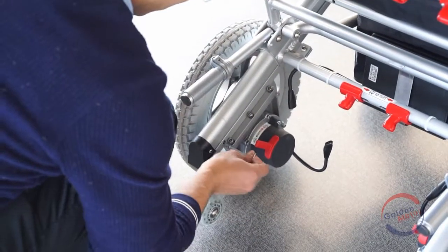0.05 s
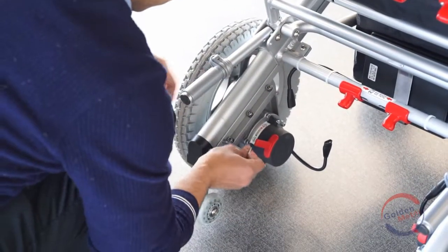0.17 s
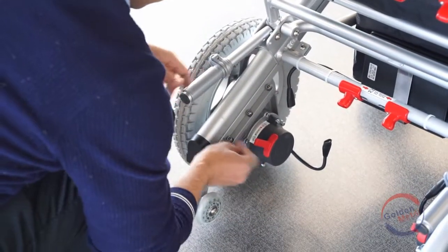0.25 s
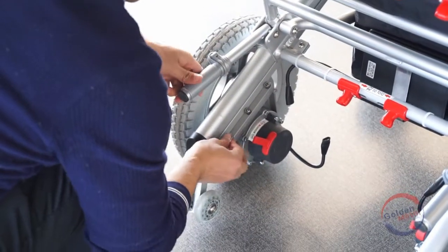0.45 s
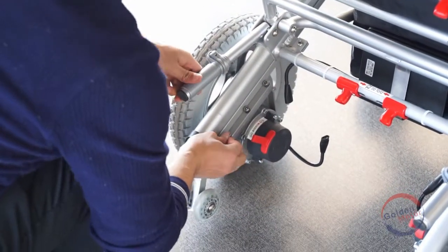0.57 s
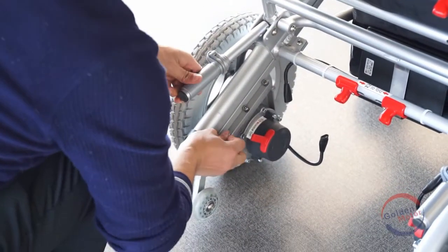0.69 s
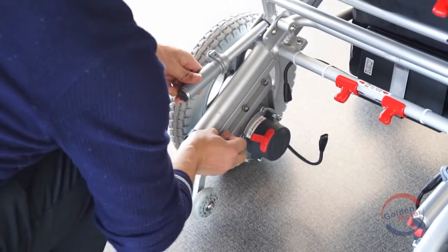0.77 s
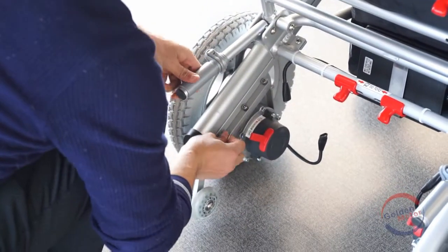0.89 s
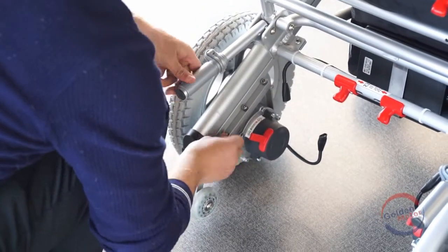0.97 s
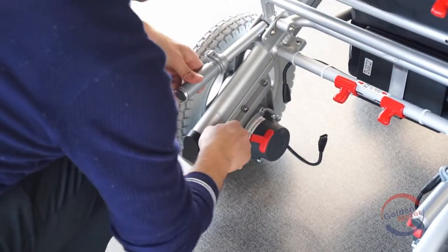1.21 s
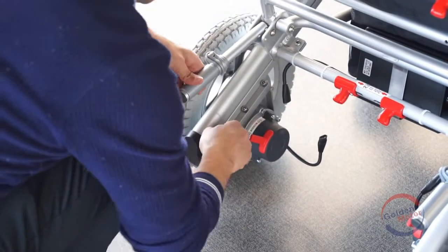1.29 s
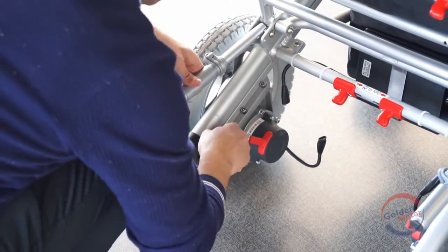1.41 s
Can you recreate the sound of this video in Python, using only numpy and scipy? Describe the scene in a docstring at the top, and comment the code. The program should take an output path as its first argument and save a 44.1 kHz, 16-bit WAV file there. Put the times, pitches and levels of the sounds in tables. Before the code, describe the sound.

A metal release catch on a wheelchair wheel ticks lightly, then snaps with a bright double clack and faint tube ringing; a tiny tick follows. Close stereo pickup, slightly right, in a reverberant hard-floored room with quiet ventilation.

```python
"""A hand works the release on the wheel motor of a folding wheelchair in a large, hard-floored room.
Ventilation runs throughout: banded noise and a wavering hum. The catch ticks, slips and snaps home with a
double clack, then a small tick follows; each contact is a filtered click plus decaying modes, scattered.
The second clack also leaves the frame's tubes ringing, as slowly dying sines.
Delayed noise bursts throw the contacts back from nearby surfaces, and a noise tail rings for about a second."""
import sys
import numpy as np
from scipy import signal
from scipy.fft import rfft, irfft
from scipy.io import wavfile
from scipy.ndimage import uniform_filter1d

SR = 44100
rng = np.random.default_rng(int(sys.argv[2]) if len(sys.argv) > 2 else 0)


def to_wav(sig):
    """Store sig (one row per channel, or 1-D mono) as 16-bit WAV at the path in sys.argv[1].

    Samples outside -1..1 are clipped; the rate is SR.
    """
    pcm = np.clip(np.atleast_2d(sig), -1, 1) * 32767
    pcm = np.round(pcm).astype(np.int16)
    wavfile.write(sys.argv[1], SR, pcm.T)  # frames by channels


N = 63945
T = np.arange(N) / SR

# corners of the contacts' tone control; two of them also place the room's build-up times
BASS_HZ, MIDDLE_HZ, CENTRE_HZ, TREBLE_HZ, TOP_HZ = 660, 2130, 4300, 10400, 14100
CRACK_LIKENESS, ECHO_LIKENESS = .75, .1   # left-right likeness, 0 to 1
SCATTER_T60_S = 0.011   # of each early echo
ROOM_BUILD_S, ROOM_BASS_BUILD_S = 0.0085, .03
ROOM_LAG_S = .0001   # the tail comes later on the right
ROOM_RING_DB, ROOM_CLICK_DB = -2.5, 3   # the room gathers sound from all directions, evening out the modes
TUBES_START_S, TUBES_BUILD_S = .2724, 0.014
HUM_HZ, HUM_DB, HUM_WAVER, HUM_WAVER_HZ = 161.7, -60.5, 0.17, 13   # waver as a share of the hum
HIT_DB, DIRECT_DB = 3, 0.5   # gain of all contacts; extra gain of their straight path
PAN_DB, ROOM_PAN_DB = -5.5, -3   # left minus right
HISS_EDGE_HZ, CUTOFF_HZ = 13900, 15600   # treble cut of the ventilation; of everything


def from_db(db):
    """Decibels to gain."""
    return 10 ** (np.asarray(db) / 20)


def rms_one(x):
    """Scale to unit power."""
    return x / np.sqrt(np.mean(x ** 2) + 1e-20)


def at_hz(points, hz):
    """Read a table on a log-frequency axis."""
    f, v = np.transpose(points)
    return np.interp(np.log(hz), np.log(f), v)


def fade(t, t60):
    """Exponential decay that loses 60 dB in t60 seconds."""
    return np.exp(-np.log(1000) * t / t60)


def panned(db):
    """Left and right gains for a level difference."""
    return from_db(np.array([[db], [-db]]) / 2)


def delayed(x, s):
    """The sound starting s seconds later, at full length."""
    return np.pad(x, ((0, 0), (int(s * SR), N)))[:, :N]


def coloured(x, points, size=2048):
    """Causal (minimum-phase) filter that follows a table of (Hz, dB)."""
    hz = np.maximum(np.fft.rfftfreq(size, 1 / SR), 1)
    cepstrum = irfft(np.log(from_db(at_hz(points, hz))))
    # folding the cepstrum forward makes the filter minimum-phase
    cepstrum[1:size // 2] *= 2
    cepstrum[size // 2 + 1:] = 0
    impulse = irfft(np.exp(rfft(cepstrum)))
    return signal.fftconvolve(x, impulse[None], axes=1)[:, :N]


def low_pass(x, hz):
    """Steep treble cut."""
    return signal.sosfilt(signal.ellip(10, .1, 80, hz, fs=SR, output="sos"), x)


def noise_bands(likeness):
    """Third-octave bands of stereo noise that add up to roughly white: (centre Hz, band)."""
    edges = 18 * 2 ** (np.arange(31) / 3)
    run_in = 4000   # samples dropped while the filters settle
    white = rng.standard_normal((2, 2, N + run_in))
    for k, (low, high) in enumerate(zip(edges, edges[1:])):
        band_pass = signal.butter(2, [low, high], "band", fs=SR, output="sos")
        # neighbouring bands take separate noises
        mid, side = signal.sosfilt(band_pass, white[k % 2])[:, run_in:]
        hz = np.sqrt(low * high)
        alike = np.clip(at_hz(likeness, hz), -1, 1)
        yield hz, np.sqrt((1 + alike) / 2) * mid + np.sqrt((1 - alike) / 2) * side * [[1], [-1]]


def burst(t60, alike, size=2048, count=6):
    """One click scattered into a dying stereo cluster of unit energy and nearly even spectrum."""
    mid, side = rng.standard_normal((2, size))
    alike = np.clip(alike, 0, 1)
    envelope = fade(T[:size], t60)
    x = (np.sqrt(1 + alike) * mid + np.sqrt(1 - alike) * side * [[1], [-1]]) * envelope
    # alternately flatten the spectrum and restore the decay
    for _ in range(count):
        x = irfft(np.exp(1j * np.angle(rfft(x))))
        local_power = uniform_filter1d(x ** 2, size=64, axis=1).clip(1e-14)
        x = x * envelope / np.sqrt(local_power)
    return x / np.linalg.norm(x, axis=1, keepdims=True)


def contact(part, bass_db, middle_db, treble_db, top_db, scatter_t60):
    """One metal contact: a click and the struck part's modes, scattered. Rows: left, right, into the room."""
    # modes of each part, relative level: pitch_hz, level_db, t60_s
    parts = {"lever": [(816, -48.5, 0.014), (2000, -54.5, 0.0049), (2740, -54, 0.017), (3560, -38.5, 0.013),
                       (4750, -36, .011), (5900, -41.5, 0.012), (6260, -53.5, .015), (9920, -39.5, .013)], "housing": [(1145, -44, 0.03), (2030, -47, 0.022), (2770, -37, .013),
                                                 (3242, -37, 0.048), (3540, -42, 0.045),
                                                 (4540, -25.5, 0.013), (5534, -29, 0.018),
                                                 (5900, -38, 0.049), (6300, -38, .016),
                                                 (7840, -30.5, 0.014), (10000, -30.5, 0.013),
                                                 (11080, -32.5, 0.018), (14100, -31, 0.0068)], "frame": [(3950, -44.5, 0.009),
                                                                           (4400, -59, .012),
                                                                           (6400, -54, 0.0069),
                                                                           (7700, -58, 0.014)]}
    # relative level of the click that comes with each part: part, level_db
    click_db = {"lever": -14.5, "housing": -2, "frame": -29}
    # colour of the bare click of metal on metal: pitch_hz, level_db (per Hz)
    crack = [(250, -16), (450, -11.5), (750, -8), (1400, -8), (2600, -1), (4000, 0.5), (5500, -0.5),
             (7200, -2), (9200, -6), (12200, -6.5), (15500, -10)]
    t = T[:N // 2]
    impulse = 1.0 * (t == 0)[None]
    click = from_db(click_db[part]) * coloured(impulse, crack)[0, :len(t)]
    ring = sum(from_db(db) * fade(t, t60) * np.cos(2 * np.pi * hz * t) for hz, db, t60 in parts[part])
    ring = ring * np.where(t == 0, .5, 1)   # halve the first sample, where the cosines jump in
    straight = click + ring
    into_room = from_db(ROOM_CLICK_DB) * click + from_db(ROOM_RING_DB) * ring
    paths = np.array([straight, straight, into_room])
    colour = [(BASS_HZ, bass_db), (MIDDLE_HZ, middle_db), (CENTRE_HZ, 0),
              (TREBLE_HZ, treble_db), (TOP_HZ, top_db)]
    scatter = burst(scatter_t60, CRACK_LIKENESS)[[0, 1, 0]]   # the room shares the left scatter
    return signal.fftconvolve(coloured(paths, colour), scatter, axes=1)


def tubes():
    """Long, faint modes that build up as ringing spreads through the frame after the hardest clack."""
    # modes of the frame's tubes: pitch_hz, level_db, t60_s
    modes = [(1122, -54, 1.3), (1427, -52, 1.5), (3280, -49, 1.1), (4585, -48, .85)]
    ring = sum(from_db(db) * fade(T, t60) * np.sin(2 * np.pi * hz * T) for hz, db, t60 in modes)
    swelling = ring * (1 - np.exp(-T / TUBES_BUILD_S))
    return delayed(swelling[None], TUBES_START_S)


def room(x):
    """Scattered early echoes, then a noise tail that builds up and dies more slowly in the bass."""
    # echoes from floor and nearby surfaces: delay_s, level_db
    echoes = [(.0112, -7.5), (.0152, -9.5), (.0182, -10.5)]
    # strength of the tail: pitch_hz, level_db
    tail_level = [(300, -14), (650, 7.5), (850, 8), (1150, 12.5), (1800, 5.5), (3000, 4), (5000, 2),
                  (9000, -3), (14500, -2)]
    # decay of the tail: pitch_hz, t60_s
    tail_t60 = [(300, 2.7), (1000, 1.65), (2000, 1.35), (3300, 1.05), (4700, 0.91), (7000, 0.71),
                (10000, 0.6), (15000, 0.46)]
    # width of the tail: pitch_hz, left-right likeness (-1 to 1)
    tail_likeness = [(300, 0.4), (1000, 0.51), (3000, 0.13), (12000, 0.05)]
    early = sum(from_db(db) * delayed(burst(SCATTER_T60_S, ECHO_LIKENESS), s) for s, db in echoes)
    tail = 0
    for hz, band in noise_bands(tail_likeness):
        build_s = at_hz([(BASS_HZ, ROOM_BASS_BUILD_S), (CENTRE_HZ, ROOM_BUILD_S)], hz)
        envelope = (1 - np.exp(-T / build_s)) * fade(T, at_hz(tail_t60, hz))
        tail = tail + from_db(at_hz(tail_level, hz)) * band * envelope / np.linalg.norm(envelope)
    tail = np.vstack([tail[:1], delayed(tail[1:], ROOM_LAG_S)])
    return panned(ROOM_PAN_DB) * signal.fftconvolve(x, early + tail, axes=1)[:, :N]


def ventilation():
    """Low rush of air as banded noise, with a hum whose strength and phase waver at random."""
    # colour of air and hiss, relative: pitch_hz, level_db (per Hz)
    air_colour = [(20, -12), (50, -5.5), (120, -2.5), (230, -2), (400, -7), (800, -8.5), (1500, -22),
                  (3000, -25), (8000, -28.5), (14000, -28.5)]
    # width of the air: pitch_hz, left-right likeness (-1 to 1)
    air_likeness = [(40, 1), (150, 0.78), (350, 0.35), (1000, 0.1), (8000, 0.034)]
    # loudness of the air over time: time_s, level_db
    air_level = [(0, -55.5), (.6, -56.5), (.95, -55.5), (1.45, -56)]
    air = rms_one(sum(from_db(at_hz(air_colour, hz)) * band for hz, band in noise_bands(air_likeness)))
    waver_filter = signal.butter(2, HUM_WAVER_HZ, fs=SR, output="sos")
    slow = signal.sosfilt(waver_filter, rng.standard_normal((2, 2 * N)))[:, N:]
    in_step, across = HUM_WAVER * rms_one(slow)
    phase = 2 * np.pi * HUM_HZ * T
    hum = rms_one((1 + in_step) * np.sin(phase) + across * np.cos(phase))
    air_gain = from_db(np.interp(T, *np.transpose(air_level)))
    return air_gain * air + from_db(HUM_DB) * hum


def scene():
    """The contacts and tubes a little to the right, the contacts' echo, and the ventilation."""
    # contacts in order: start_s, part struck, level_db (HIT_DB is added), then the colour as
    # bass_db, middle_db, treble_db, top_db, then scatter_t60_s, room_send_db
    contacts = [(0.1265, "lever", -16.5, 10.5, 10.5, -1, 0, 0.031, 6),
                (0.1389, "lever", 1.5, 4.5, 1, -4, -20, 0.034, 2),
                (0.1578, "lever", -11, -9, 6, 6.5, -4, 0.012, -2),
                (0.242, "housing", -8, -6, 3, 8.5, -6.5, .024, 2.5),
                (0.2724, "housing", 1, -4.5, 1.5, 0, 0, .024, 3),
                (0.6481, "frame", 5, 2, -2, -10, -24, 0.039, -3.5)]
    direct, send = tubes(), 0
    for start_s, part, level_db, *manner, send_db in contacts:
        hit = from_db(HIT_DB + level_db) * delayed(contact(part, *manner), start_s)
        direct = direct + from_db(DIRECT_DB) * hit[:2]
        send = send + from_db(send_db) * hit[2:]
    return panned(PAN_DB) * direct + room(send) + low_pass(ventilation(), HISS_EDGE_HZ)


def record(dry):
    """The top is cut steeply."""
    return low_pass(dry, CUTOFF_HZ)


dry = scene()
out = record(dry)
to_wav(out)
```